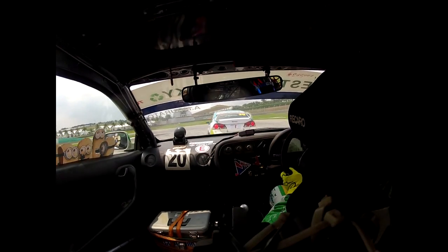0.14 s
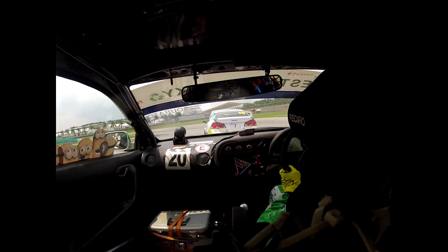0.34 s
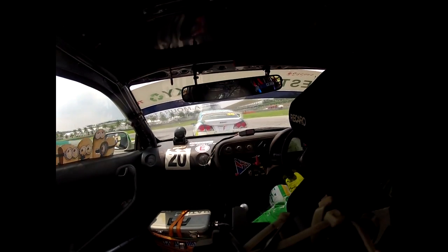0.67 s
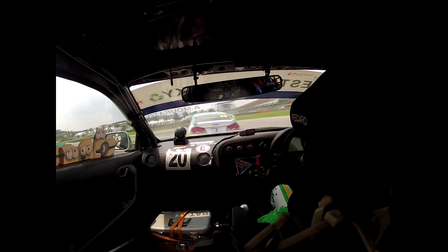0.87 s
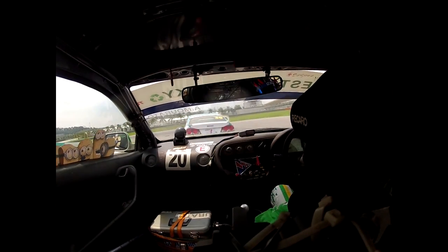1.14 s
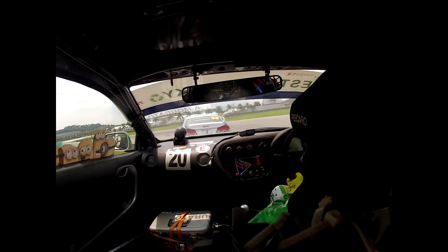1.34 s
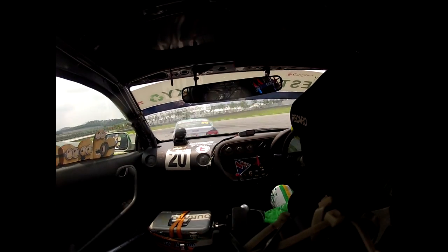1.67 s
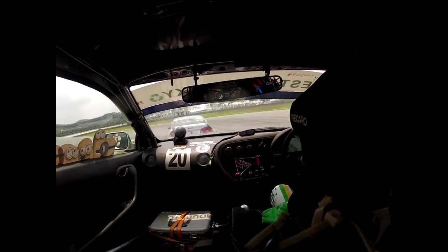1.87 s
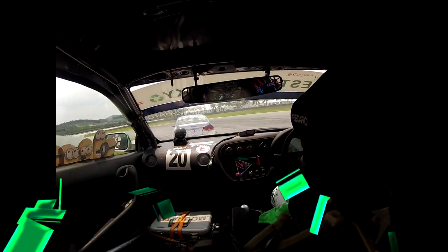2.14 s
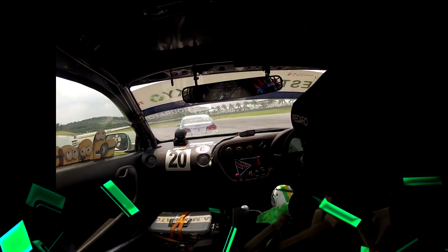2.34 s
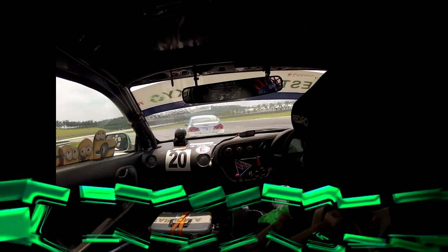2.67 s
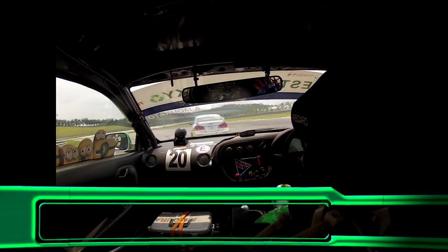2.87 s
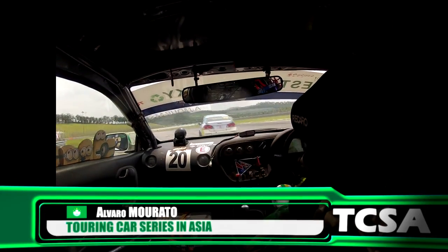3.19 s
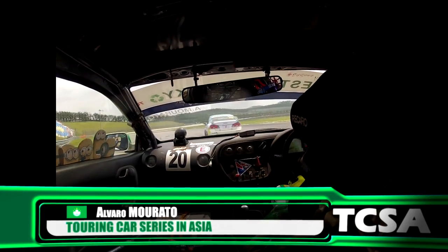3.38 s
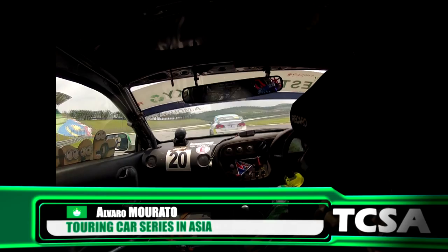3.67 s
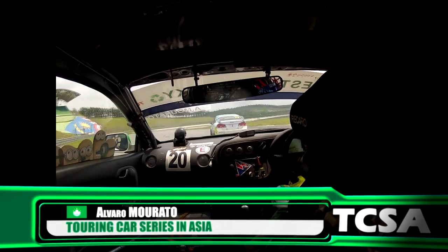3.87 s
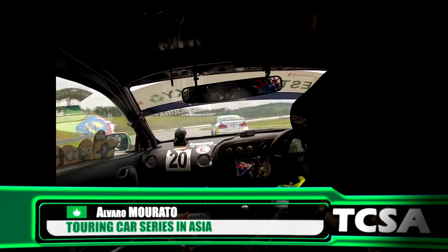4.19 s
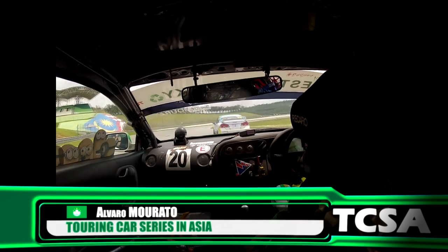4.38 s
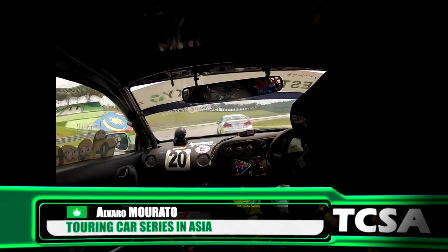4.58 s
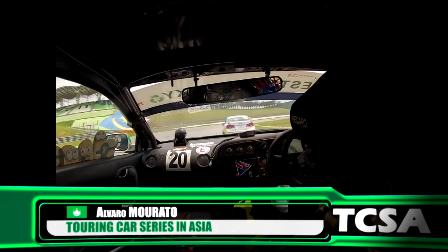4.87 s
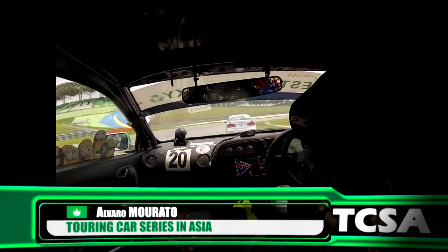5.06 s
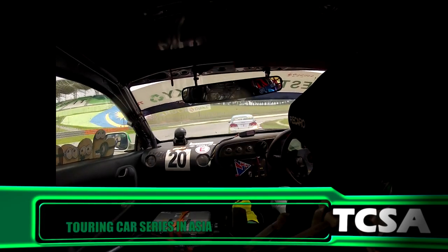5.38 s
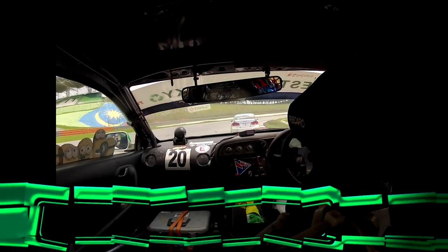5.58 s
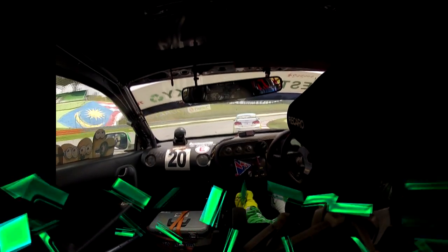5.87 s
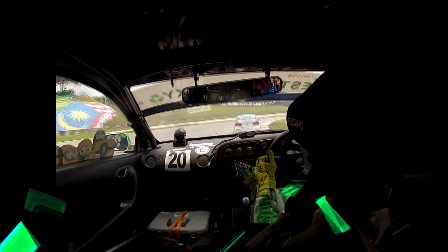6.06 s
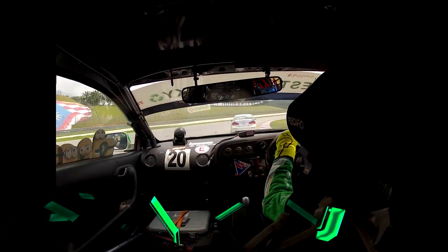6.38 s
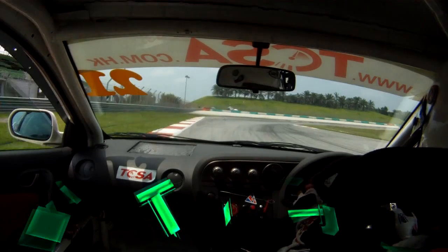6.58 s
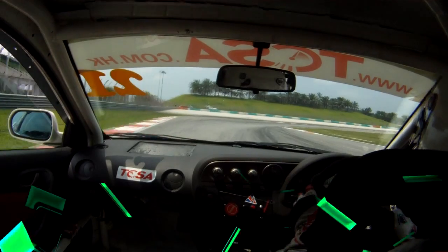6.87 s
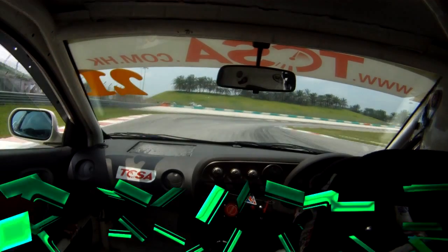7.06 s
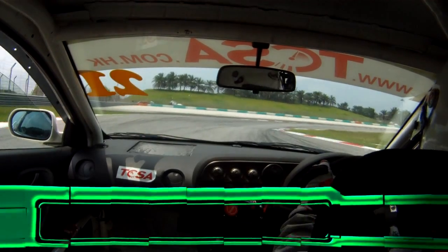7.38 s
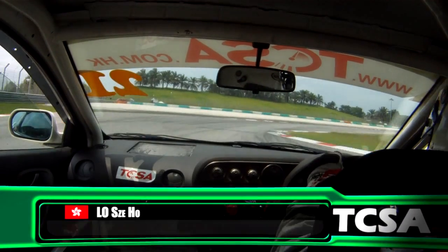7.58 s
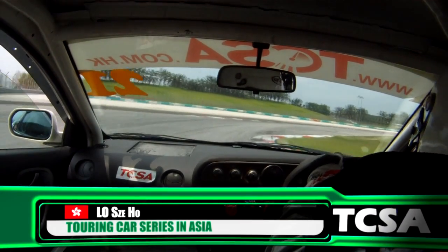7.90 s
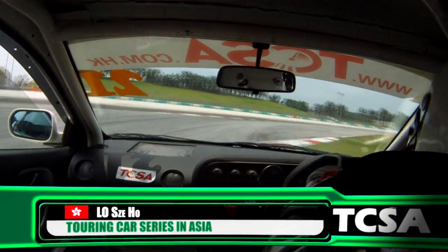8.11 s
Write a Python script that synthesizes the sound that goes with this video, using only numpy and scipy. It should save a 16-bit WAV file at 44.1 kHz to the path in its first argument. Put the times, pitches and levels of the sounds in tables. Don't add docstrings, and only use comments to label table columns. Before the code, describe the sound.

Inside a bare racing saloon, a cheap mono camera microphone near the trim gives a coarse, gritty, close sound. From 0 s the already running four-cylinder engine booms, its firing note around 230 Hz falling under braking to about 183 Hz by 1.5 s, with brief stumbles and a ragged, roaring intake. From about 1.9 s it pulls cleanly, climbing steadily to about 300 Hz by 5.6 s, with buzzing panels and singing overtones. Trim knocks gather from 3 s and clatter hardest around 3.6-3.8 s; the boom dips briefly near 4.3 s. At 5.6-6 s an upshift drops the note in steps to about 225 Hz, then it rises again. At 6.5 s a hard cut brings a second cabin: quieter, duller and hoarser, slowing from 273 to about 227 Hz until just after 8 s, cut off still running. Low tyre rumble, floor thumps and faint wind hiss continue throughout.

```python
import sys
import numpy as np
from scipy import signal
from scipy.fft import rfft, irfft, next_fast_len
from scipy.io import wavfile
from scipy.ndimage import uniform_filter1d, map_coordinates

SR = 44100
rng = np.random.default_rng(int(sys.argv[2]) if len(sys.argv) > 2 else 0)


def to_wav(s):
    ch = np.atleast_2d(s).T
    pcm = np.round(np.clip(ch, -1, 1) * 32767)
    wavfile.write(sys.argv[1], SR, pcm.astype(np.int16))


def attenuation_scalar(level_db):
    decades = np.asarray(level_db, float) / 20
    return 10 ** decades


N = 363384
TIME = np.arange(N) / SR
STEP = 64


# start_s,
# end_s, order, level_db
FLARES = [(0.5, 0.492, 2.5, -22), (0.935, 1.209, 5, -31), (1.6, 1.8, 4.5, -27.5), (3, 3.097, 7, -47.5),
          (3.584, 3.832, 2.25, -24), (3.85, 4.12, 6, -39.5), (4.049, 4.46, 5.5, -38.5),
          (4.448, 4.736, 4, -31), (4.5, 4.927, 1.25, -27), (5, 5.043, 5, -28), (4.922, 5.288, 2.75, -23),
          (5, 5.586, 1.5, -23), (5.5, 5.5, 5, -25), (4.903, 5.397, 7, -44.5), (6.204, 6.527, 1.75, -20),
          (6.248, 6.394, 5, -34), (6.197, 6.503, 6, -39.5), (3, 3.402, 3, -31), (6.5, 6.8, 1.5, -33),
          (6.5, 8.1, .5, -46), (8, 8.042, 4, -42), (2.705, 3.105, 4, -28), (6, 6.558, 4, -32.5),
          (-.05, .2, 2, -24), (6, 5.92, 1.5, -25.5), (5.632, 5.893, 2, -23.5), (6.5, 6.945, 3, -27),
          (7.25, 7.7, 3, -34), (7, 7.697, 2.5, -36), (7.5, 8.25, 3, -29), (.9, 1.22, 1.25, -27),
          (1.9, 1.87, 1.25, -22.5), (.63, .82, 2.25, -25.5), (.87, 1.02, 2.25, -23), (1.4, 1.82, 2.25, -24),
          (1.2, 1.43, 4.5, -24), (1.19, 1.3, 3.25, -23), (1.7, 1.7, 2.5, -25), (5, 5.1, 1.5, -28),
          (6.77, 6.94, 2.5, -31), (7, 7.17, 3, -36), (7.78, 8.02, 3, -37), (6.5, 6.63, 3, -33),
          (7.98, 8.17, 2.5, -33), (6.83, 7, 4.5, -40), (8.5, 8.03, 5, -43), (7, 7.4, 4.5, -43),
          (3.5, 3.6, 4, -31), (4.5, 4.08, 4, -34), (3.4, 3.6, 5, -36),
          (0.206, 0.619, 2, -16.5), (0.66, 0.97, 4, -21.5), (.33, .6, 3, -25), (0.278, 0.54, 4, -32),
         (0.68, .9, 3, -19.5), (.93, 1.1, 3, -19.5), (1.1, 1.4, 3, -21), (0.914, 1.23, 2, -19.5),
         (1.42, 1.738, 3, -21), (1.443, 1.694, 2, -21), (1.68, 1.87, 4, -20.5), (1.692, 2.331, 3, -20),
         (1.878, 2.218, 2, -18.5), (1.973, 2.208, 4, -24.5), (2.294, 2.546, 2, -19),
         (2.45, 2.848, 3, -22.5), (2.546, 3.06, 2, -14.5), (3, 3.22, 2, -18), (.53, .63, 4, -17),
         (3.371, 3.644, 2, -20.5), (3.856, 3.978, 3, -17), (4.018, 4.31, 3, -15), (4.26, 4.533, 3, -18.5),
         (3.863, 4.08, 2, -22.5), (4.05, 4.28, 2, -27), (1.52, 1.58, 2, -14), (1.6, 1.68, 2, -15),
         (1.68, 1.84, 2, -20.5), (1.41, 1.52, 3, -16.5), (7.334, 7.47, 2, -34), (7.13, 7.328, 1.5, -26),
         (4.448, 4.793, 2, -18), (4.765, 5.524, 2, -19.5), (4.5, 5.004, 3, -27), (5.516, 5.632, 2, -17.5),
         (5.722, 6, 3, -18), (6.005, 6.201, 2, -22), (6.236, 6.546, 2, -18), (6.256, 6.547, 3, -31),
         (6.452, 6.69, 2, -27), (6.866, 7.065, 1.5, -24), (7.134, 7.464, 1.5, -27.5),
         (7.514, 8.06, 2, -30.5), (8.102, 8.3, .5, -24),
          (0.278, 0.543, 10, -39.5), (0.304, .56, 5, -37), (0.056, 0.202, 6, -33.5), (0.071, .2, 9, -40),
            (0.933, 1.12, 10, -38), (.95, 1.14, 12, -41), (3.4, 3.623, 6, -36.5), (3.85, 4.096, 9, -36.5),
            (3.85, 3.9, 10, -49.5), (4.97, 5.5, 4, -37.5), (4.8, 5.08, 8, -37.5), (5.26, 5.5, 6, -37.5),
            (4.4, 4.57, 8, -37), (4.45, 4.4, 5, -36.5), (4.7, 5.05, 7, -39.5), (4.76, 5.03, 5, -30),
            (4.5, 4.75, 11, -48), (5.44, 5.58, 7, -37), (5.62, 5.78, 4, -33), (5.0, 5.3, 7, -38),
            (3.85, 4.08, 8, -39), (2.1, 2.4, 7, -41.5), (2.3, 2.9, 10, -43.5), (4.3, 4.5, 4.5, -39),
            (5.15, 5.45, 8, -42)]
# centre_s, half_length_s, depth_db
STUMBLES = [(.1, 0.06, 14.5), (.58, .04, 6), (.68, 0.026, 7), (.93, .03, 14), (1.24, .04, 37),
            (1.42, .03, 2.5), (1.59, .04, 11), (3.555, 0.04, 14.5), (4.11, 0.065, 7), (4.34, .05, 9),
            (3.86, 0.056, 9), (4.44, 0.06, 12), (5, 0.24, 5), (5.64, .06, 15), (5.77, 0.07, 26),
            (5.98, 0.018, 7.5), (7.19, 0.044, 8), (7.8, .04, 5.5), (2.63, 0.068, 6.5), (6.08, 0.023, 2.5),
            (.3, .05, 6.5), (8.07, 0.13, 4.5)]
# centre_s, half_length_s, depth_db
SLIPS = [
    (5.62, .16, 11.5),
    (4.2, .15, 4.5),
]
# time_s, break_up_factor
RAGGED = [
    (0, 1),
    (.6, 1),
    (1, 1.8),
    (1.7, 1.8),
    (1.9, 1),
    (6.5, 1),
    (6.52, 1.05),
    (8.24, 1.05),
]


def engine_orders(t, turn, firing_hz, boom_db, shake_db, buzz_db, side_db, tone,
                  cabin, buzz, rest_db, whole_db, half_db):
    slow, quick = t[::STEP], t[::4]
    curves = (firing_hz, boom_db, shake_db, buzz_db, side_db, tone)
    firing_hz, boom_db, shake_db, buzz_db, side_db, tone = (c[::STEP] for c in curves)
    stumble_db = tents(STUMBLES, slow)
    boom_db = boom_db - stumble_db
    slack_db = 0.92 * stumble_db
    slip_db = tents(SLIPS, slow)
    ragged = curve(RAGGED, slow)
    panels = shaped(buzz)
    line_share = np.sqrt(tone * firing_hz / 4 / np.sum(panels(np.arange(500, 6000)) ** 2))
    orders = np.zeros(len(quick))
    for order in np.arange(1, 64) / 4:
        order_hz = order * firing_hz
        drift_db = 3.2 * wobble(9, slow)
        flutter_db = 1.5 * wobble(24, slow)
        break_db = 2 * ragged * wobble(17, slow)
        scatter = (.1 + .024 * order) * wobble(20, slow)
        phase = np.interp(quick, slow, scatter) + rng.uniform(0, 2 * np.pi)
        if order in (1, 2):
            phase += np.pi / 2 - (order - 1) * .7 - phase.mean()

        if order == 1:
            gain = attenuation_scalar(boom_db + flutter_db)
        elif order in rest_db:
            gain = attenuation_scalar(rest_db[order] + 0.32 * shake_db + 1.06 * drift_db - .5 * slack_db - slip_db)
        else:
            kind_db = whole_db if order % 1 == 0 else half_db if order % .5 == 0 else 0
            under_db = -2 * (order < 1)
            in_cabin = attenuation_scalar(side_db - .4 * slack_db + under_db) * cabin_gain(cabin, order_hz)
            in_panels = attenuation_scalar(buzz_db - 2 - slack_db) * line_share * panels(order_hz) * timing_blur(order_hz)
            gain = attenuation_scalar(kind_db + drift_db) * np.hypot(in_cabin, in_panels)

        for start, end, which, db in FLARES:
            if abs(which - order) < .125:
                during = (slow > start) & (slow < end)
                mean_db = np.sum(break_db * during) / (np.sum(during) + 1)
                swell = np.clip(np.minimum(slow - start, end - slow) / 0.041, 0, 1)
                gain = np.hypot(gain, attenuation_scalar(db + break_db - mean_db) * swell)
        gain = gain * attenuation_scalar(1.6 * (ragged - 1) * flutter_db)
        orders += np.sqrt(2) * np.interp(quick, slow, gain) * np.sin(order * turn[::4] + phase)
    return signal.resample_poly(orders, 4, 1)[:len(t)]


def timing_blur(f):
    return 1 / np.sqrt(1 + (f / 2700) ** 4)


def cabin_gain(cabin, f):
    power = 0
    for hz, width_hz, db in cabin:
        detuning = (f * f - hz * hz) / (f * width_hz + 1)
        power = power + attenuation_scalar(2 * db) / (1 + detuning ** 2) ** 2
    return np.sqrt(power)


def intake_roar(on, roar_db, pulse, firing_hz, cabin):
    t = TIME[on]
    roar = noise(lambda f: cabin_gain(cabin, f), patchy_db=1.6)
    deep = filtered(roar, lambda f: 1 / (1 + (f / 240) ** 8))
    thin = np.clip((firing_hz - 258) / 70, 0, .7)
    thin = thin + np.clip(.6 * (curve(RAGGED, t) - 1), 0, .6)
    level = attenuation_scalar(roar_db + 0.99 * wobble(8.1, t) + 1.4 * wobble(14, t))
    return level * pulse * (roar[on] - thin * deep[on])


def panel_buzz(on, buzz_db, pulse, tone, buzz):
    hiss = noise(shaped(buzz), patchy_db=1.7)
    toned = filtered(hiss, lambda f: timing_blur(f) ** 2)
    hiss = hiss[on] - (1 - np.sqrt(1 - tone)) * toned[on]
    return attenuation_scalar(buzz_db - 2 + 1.1 * wobble(18, TIME[on])) * pulse * hiss


# centre_s, half_length_s, level_db
RATTLE = [
    (.1, .15, -48),
    (3.277, 0.47, -37),
    (3.585, 0.048, -25.5),
    (3.645, 0.035, -26.5),
    (3.76, 0.034, -24),
    (3.364, .03, -33),
    (3.882, 0.032, -28.5),
    (4.033, 0.091, -39),
]
# time_s, peak_db
KNOCKS = [(0.1697, -30.5), (0.458, -33.5), (1.266, -33), (1.4544, -38.5), (1.8457, -34), (2.0173, -32),
          (2.8285, -33.5), (3.0111, -34), (3.061, -28), (3.14, -34), (3.1956, -33.5), (3.2605, -30),
          (3.2919, -27), (3.3328, -31), (3.3542, -26.5), (3.5636, -27), (3.5813, -27), (3.6344, -25),
          (3.6466, -22.5), (3.6645, -25), (3.6923, -26), (3.7095, -27.5), (3.7259, -21.5), (3.7424, -21),
          (3.7576, -22.5), (3.7744, -24.5), (3.7894, -24.5), (3.8768, -28), (4.0194, -29.5), (4.046, -27)]
# freq_hz, level_db
KNOCK_COLOUR = [(300, -30), (700, 15), (1500, 13.5), (2500, 9), (3800, 4), (4500, -6), (6000, -7),
                (7000, -59.5)]


def rattle():
    knocks = (rng.random(N) < 220 / SR) * rng.uniform(.3, 1, N)
    tick = rng.standard_normal(240) * attenuation_scalar(-np.arange(240) / 9)
    burst = np.convolve(knocks, tick)[:N]
    level = attenuation_scalar(-55.5) + tents([(s, half, attenuation_scalar(db)) for s, half, db in RATTLE], TIME)
    single = np.zeros(N)
    ring_s = np.arange(1200) / SR
    for s, db in KNOCKS:
        decay = attenuation_scalar(db - 1 - 60 * ring_s / .06)
        onset = 1 - np.exp(-ring_s / .0015)
        single[round(s * SR):][:len(ring_s)] += decay * onset * rng.standard_normal(len(ring_s))
    return level * unit(filtered(burst, shaped(FIRST_BUZZ))) + filtered(single, shaped(KNOCK_COLOUR))


# time_s, level_db
TARMAC = [
    (0, -2),
    (1.2, 6),
    (2.3, 3),
    (3.3, 1.5),
    (4.3, -2.5),
    (5.4, -1.5),
    (6.1, 1),
    (6.7, 1.5),
    (7.3, -3),
    (8.24, -2),
]
# time_s, level_over_rumble_db
BUMPS = [(.11, 5.5), (.5, 7), (.9, 9), (1.2, -0.5), (1.45, 9), (1.6, 2.5), (1.75, 11), (2.34, 14),
         (2.66, 8.5), (2.93, 6), (3.12, 10.5), (3.55, 8), (3.76, -2.5), (4.04, 6.5), (4.55, 5.5), (4.9, 19),
         (5.07, 6), (5.35, 5.5), (5.75, 1), (6.019, 10.5), (6.239, 9.5), (6.459, 11.5), (6.82, 9),
         (7.39, 6), (7.83, 3), (8.12, 6)]


def road_rumble(on, road_db, road):
    t = TIME[on]
    bumps_db = tents([(s, .09, db) for s, db in BUMPS], t)
    level = attenuation_scalar(road_db + curve(TARMAC, t) + bumps_db - 1)
    return level * noise(shaped(road), patchy_db=-2.5)[on]


def wheel_hop(t):
    hop_hz = 27 + 2 * wobble(8.3, t)
    return attenuation_scalar(-37.5 + 3.8 * wobble(5.4, t)) * np.sin(2 * np.pi * np.cumsum(hop_hz) / SR)


def wind(on, buzz):
    return attenuation_scalar(-47) * noise(shaped(buzz), patchy_db=.7)[on]


def unit(x):
    return x / np.sqrt(np.mean(x ** 2) + 1e-20)


def curve(rows, t):
    s, value = np.transpose(rows)
    return np.interp(t, s, value)


def tents(rows, t):
    return sum(height * np.clip(1 - abs(t - s) / half, 0, 1) for s, half, height in rows)


def wobble(rate, t):
    return map_coordinates(rng.standard_normal(400), [t * rate])


def filtered(x, response):
    m = next_fast_len(N + 8192)
    return irfft(rfft(x, m) * response(np.fft.rfftfreq(m, 1 / SR)), m)[..., :N]


def noise(response, patchy_db):
    z = signal.stft(rng.standard_normal(N), nperseg=1024)[2]
    field = uniform_filter1d(rng.standard_normal(z.shape), size=5, axis=0)
    field = uniform_filter1d(field, size=5, axis=1)
    patchy = signal.istft(z * attenuation_scalar(patchy_db * unit(field)), nperseg=1024)[1][:N]
    return unit(filtered(patchy, response))


def shaped(points):
    hz, db = np.transpose(points)
    return lambda f: attenuation_scalar(np.interp(np.log(f + 1), np.log(hz + 1), db, -120, -120))


# centre_s, half_length_s, speed_change_hz
SURGES = [(0, 0.074, -5.5), (.55, 0.056, 3), (1.3, .12, 2.5), (1.9, .2, 1.5), (2.3, 0.1193, 1.5),
          (2.68, 0.15, 3), (3.65, 0.14, 1.5), (3.88, 0.13, 2.5), (4.44, 0.11, -1.5), (4.56, .15, 1.5),
          (6.75, 0.058, -1), (7.75, 0.044, -1)]


def saloon(speed, throttle, intake, shake, rest_db, mix_db, cabin, buzz, road, whole_db, half_db, gate, tone):
    on = slice(round(speed[0][0] * SR), round(speed[-1][0] * SR))
    t = TIME[on]
    firing_hz = curve(speed, t) + tents(SURGES, t)
    turn = 2 * np.pi * np.cumsum(firing_hz) / SR
    pulse = 1 + gate * np.cos(turn) + gate * 0.41 * np.cos(turn / 4)
    shake_db, intake_db = curve(shake, t), curve(intake, t)
    buzz_db, road_db, roar_db, side_db = mix_db
    jolt_db = tents([(s, half, max(db + 29, 0)) for s, half, db in RATTLE], t)
    buzz_db = buzz_db + shake_db + jolt_db
    road_db = road_db + 0.21 * shake_db
    roar_db = roar_db + intake_db
    side_db = side_db + 0.28 * intake_db + 4.1 * wobble(5.1, t)
    tone = tone * np.clip((firing_hz - 150) / 150, .1, 1)
    tone = tone * attenuation_scalar(-2 * tents(SLIPS, t))

    sound = engine_orders(t, turn, firing_hz, curve(throttle, t), shake_db, buzz_db, side_db, tone,
                          cabin, buzz, rest_db, whole_db, half_db)
    sound += intake_roar(on, roar_db, pulse, firing_hz, cabin)
    sound += panel_buzz(on, buzz_db, pulse, tone, buzz)
    sound += road_rumble(on, road_db, road)
    sound += wheel_hop(t)
    sound += wind(on, buzz)
    since_start = t - t[0] + .01 * (t[0] == 0)
    out = np.zeros(N)
    out[on] = sound * np.clip(np.minimum(since_start, t[-1] - t) / .0015, 0, 1)
    return out


# time_s, firing_hz
FIRST_SPEED = [(0, 226.7), (.15, 232), (.31, 213.8), (.51, 207.9), (.7, 191), (1.2, 186), (1.55, 183),
               (1.92, 192.3), (2.53, 199.6), (3.46, 229.8), (4.53, 270.5), (5.58, 300), (5.65, 276),
               (5.78, 272.6), (5.82, 256.2), (5.96, 254.7), (6.01, 224.7), (6.51, 233.3)]
# time_s, level_db
FIRST_THROTTLE = [(0, -5), (.18, -4.5), (.5, -8.5), (.7, -12), (0.999, -21.5), (1.65, -20.5), (1.919, -7),
                  (2.07, -11), (2.57, -4), (2.738, -9), (3.33, -6), (4.05, -7.5), (4.301, -21.5),
                  (4.53, -11), (5.43, -11), (5.699, -15.5), (6.2, -4.5), (6.511, -22)]
# time_s, level_db
FIRST_INTAKE = [(0, -2), (.12, 6), (.25, -4), (.58, -3), (.7, 2), (1.45, 8.5), (1.75, 6), (2.05, 3.5),
                (2.75, -1), (3.3, 2.5), (3.6, 3.5), (4.06, 4), (4.11, -8), (4.38, -8), (4.5, 2.5),
                (5.15, 2), (5.55, 6), (6.3, 0)]
# time_s, level_db
FIRST_SHAKE = [(0, 0.5), (0.221, -3.5), (.45, -2), (0.621, -2.5), (1.45, 1.5), (2.1, -1), (2.5, -1.5),
               (2.7, 0), (3, -3), (3.5, 2), (3.7, 3.5), (3.85, 2), (4.05, 3.5), (4.13, -3.5), (4.33, -1),
               (4.48, 2.5), (5.151, 4), (5.369, 4.5), (5.68, 5.5), (6.25, 1.5), (6.508, 6.5)]
FIRST_REST_DB = {2: -31.5, 3: -34.5, 4: -39.5}
# buzz_db, road_db, roar_db, side_orders_db
FIRST_MIX_DB = (-30.5, -32, -22, -35)
# freq_hz, width_hz, level_db
FIRST_CABIN = [(63.5, 16, 3), (234, 69, 3.5), (398.7, 114, 0.5), (569, 124, -3.5), (785, 95, 0)]
# freq_hz, level_db
FIRST_BUZZ = [(530, -29.5), (900, -9), (998, -10.5), (1120, -1), (1260, -6), (1440, 3.5), (1630, -13.5),
              (1800, -3), (2050, -2.5), (3150, -18.5), (3640, -16), (4100, -26), (6000, -27.5), (7800, -69),
              (13200, -120)]
# freq_hz, level_db
FIRST_ROAD = [(8.8, -36.5), (15, -9.5), (32, -3), (70, 3.5), (103, 2.5), (110, -12), (125, -26.5),
              (151, -25.5), (165, -25), (210, -30), (360, -120)]


def first_saloon():
    return saloon(FIRST_SPEED, FIRST_THROTTLE, FIRST_INTAKE, FIRST_SHAKE, FIRST_REST_DB, FIRST_MIX_DB,
                  FIRST_CABIN, FIRST_BUZZ, FIRST_ROAD, whole_db=7, half_db=1, gate=.25, tone=.72)


# time_s, firing_hz
SECOND_SPEED = [(6.51, 273.4), (6.71, 254.1), (6.95, 249), (7.09, 234), (7.21, 242.9), (7.59, 233.1),
                (7.75, 227.2), (8.07, 227.3), (8.24, 231.4)]
# time_s, level_db
SECOND_THROTTLE = [(6.51, -13.5), (6.82, -16.5), (7.11, -12.5), (7.3, -15.5), (7.48, -13.5), (7.6, -13.5),
                   (7.99, -12.5), (8.24, -15.5)]
# time_s, level_db
SECOND_INTAKE = [(6.51, 0), (6.65, 3), (6.85, 3.5), (7.05, -1), (7.4, -0.5), (7.68, -11.5), (7.83, -2.5),
                 (7.95, -10.5), (8.24, 4)]
# time_s, level_db
SECOND_SHAKE = [(6.51, 2), (6.7, 2.5), (7.05, -0.5), (7.15, -7.5), (7.38, 1.5), (7.679, -7), (7.83, -4.5),
                (8.07, -7), (8.149, 1), (8.24, -5.5)]
SECOND_REST_DB = {2: -34.5, .5: -29, 1.5: -36}
# buzz_db, road_db, roar_db, side_orders_db
SECOND_MIX_DB = (-33, -34.5, -27.5, -38)
# freq_hz, width_hz, level_db
SECOND_CABIN = [(207, 130, 2.5), (335, 83, -15.5), (519, 484, -5.5), (690, 71, -7.5), (1190, 310, -16.5)]
# freq_hz, level_db
SECOND_BUZZ = [(530, -28), (900, -13), (1010, -13.5), (1300, -8.5), (1430, -19), (1540, -10), (2040, -4),
               (2870, -2.5), (3610, -12), (5080, -17), (6000, -25.5), (7800, -68), (13200, -120)]
# freq_hz, level_db
SECOND_ROAD = [(8.8, -40), (15, -17), (43, -7), (65, -27.5), (81, -10), (88, -22), (100, -5), (130, -31),
               (220, -120)]


def second_saloon():
    return saloon(SECOND_SPEED, SECOND_THROTTLE, SECOND_INTAKE, SECOND_SHAKE, SECOND_REST_DB, SECOND_MIX_DB,
                  SECOND_CABIN, SECOND_BUZZ, SECOND_ROAD, whole_db=5.5, half_db=5.5, gate=.2, tone=.1)


def scene():
    mono = first_saloon() + second_saloon() + rattle()
    lean = attenuation_scalar(-39) * wobble(44, TIME)
    return mono * (1 + np.array([lean, -lean]))


def top_cut(x):
    return signal.sosfilt(signal.butter(12, 15040, fs=SR, output="sos"), x)


def record(dry):
    sampled = signal.resample_poly(dry, 40, 147, axis=1)
    held = np.repeat(sampled, 4, axis=1)
    held = signal.resample_poly(held, 147, 160, axis=1)

    def response(f):
        band = (f < 15050) / np.sqrt(1 + (f / 14500) ** 4)
        notch = 1 - .7 / (1 + ((f - 6000) / 130) ** 2)
        return band * notch

    clipped = np.clip(filtered(held, response), -.995, .995)
    return top_cut(clipped)


dry = scene()
out = record(dry)
to_wav(out)
```